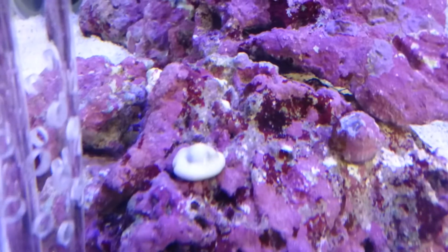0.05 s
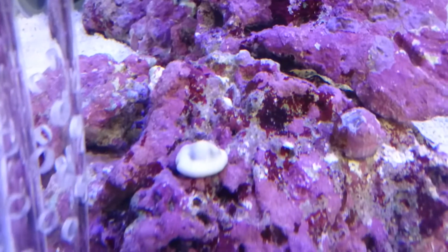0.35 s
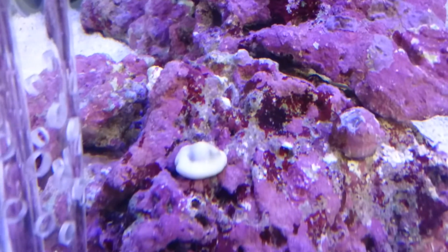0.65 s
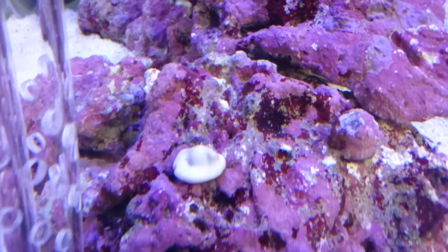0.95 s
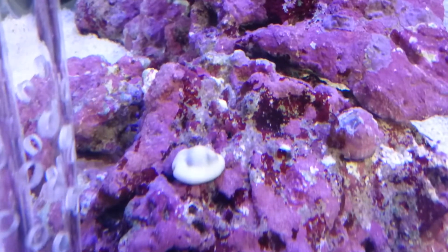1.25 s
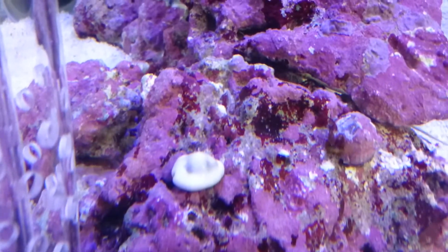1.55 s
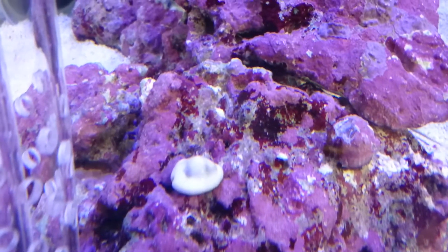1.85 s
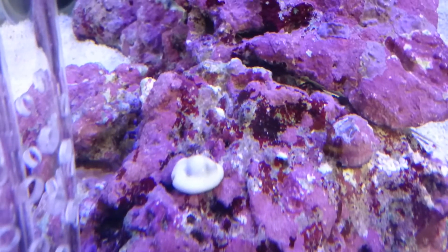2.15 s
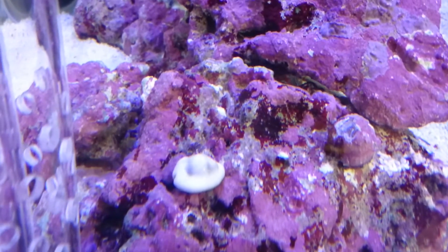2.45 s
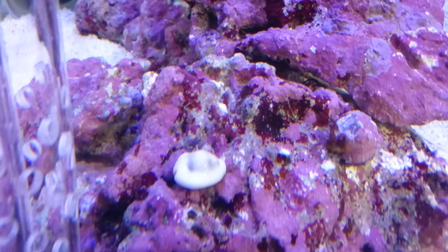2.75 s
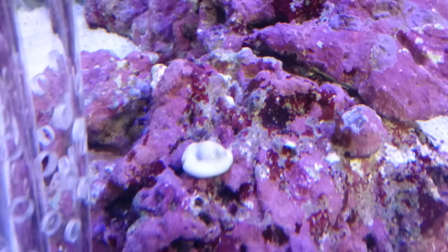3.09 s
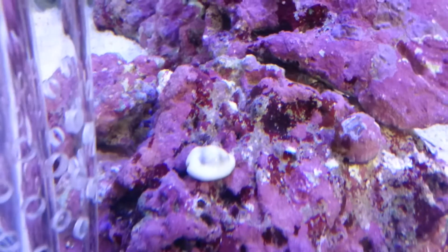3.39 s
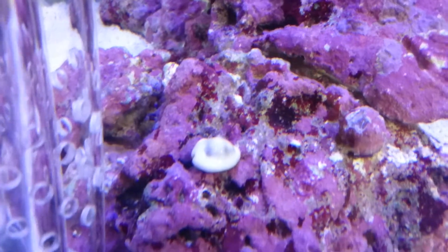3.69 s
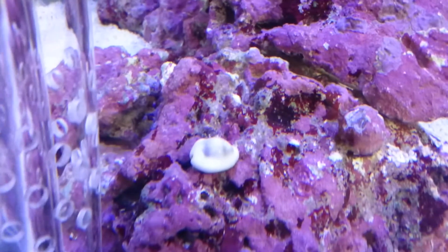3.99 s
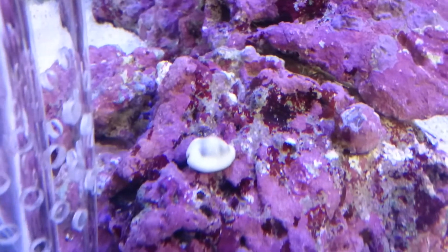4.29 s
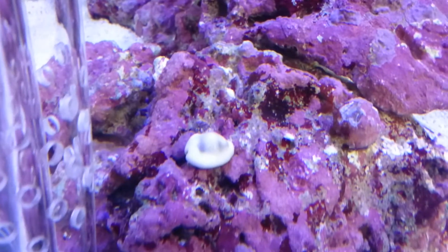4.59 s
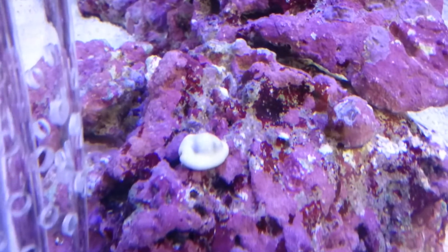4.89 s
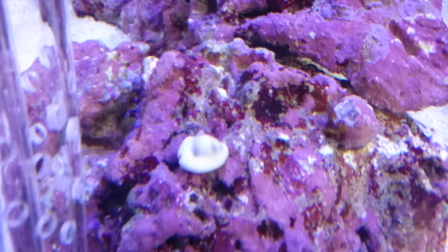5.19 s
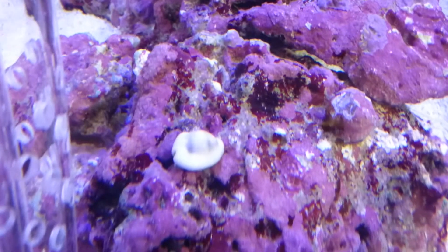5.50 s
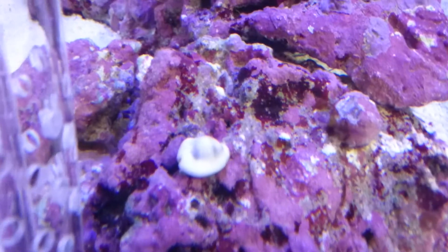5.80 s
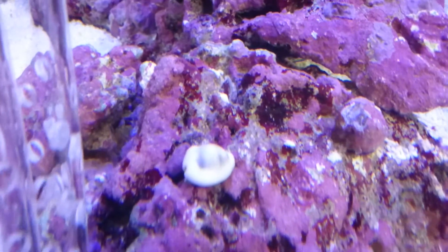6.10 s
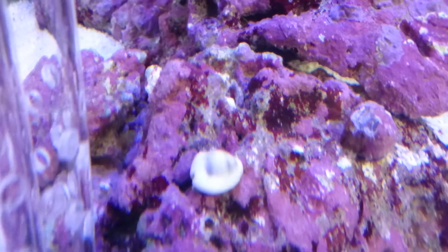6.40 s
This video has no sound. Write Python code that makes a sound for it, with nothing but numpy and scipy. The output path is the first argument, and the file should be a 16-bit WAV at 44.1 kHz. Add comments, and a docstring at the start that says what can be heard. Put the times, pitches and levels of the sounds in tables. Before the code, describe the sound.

Small bubbles plink and fizz in a fish tank while a pump hums quietly, interrupted once by a loud, sharp click.

```python
"""Water circulates in a home aquarium. From the start a pump and the mains hum under a low rush, while
bubbles plink at the surface and tiny ones fizz and burst, ringing between the glass walls. Near 2.7 s
a faint, high whistle glides by, and then a hand softly bumps the camera. At 3.8 s a sharp knock rings
the camera's body. From 4.6 s the surface spits fine spray and the whistle returns; two more bumps and
a dull knock come last. The hum is nearly opposite in phase on the left and right."""
import sys
import numpy as np
from scipy import signal
from scipy.fft import rfft, irfft, next_fast_len
from scipy.io import wavfile
from scipy.ndimage import uniform_filter1d, map_coordinates

SR = 44100
rng = np.random.default_rng(int(sys.argv[2]) if len(sys.argv) > 2 else 0)


def pcm_store(signal):
    """Save signal as 16-bit PCM."""
    levels = np.round(np.clip(np.atleast_2d(signal), -1, 1) * 32767)
    wavfile.write(sys.argv[1], SR, levels.astype(np.int16).T)


N = 288678

# The tone colour of fine spray. Each row: frequency in Hz, level in dB.
SPRAY_COLOUR = [(800, -3), (2500, 0), (6000, -3), (9000, 7.5), (12000, -2.5), (15500, 2.5)]


def amp(db):
    """Turn decibels into a gain."""
    return 10 ** (np.asarray(db) / 20)


def unit(x):
    """Scale a sound so that its average strength (rms) is 1."""
    return x / np.sqrt(np.mean(x ** 2) + 1e-20)


def envelope(t, t60, attack):
    """Rise in about `attack` seconds while fading by 60 dB every `t60` seconds."""
    return amp(-60 * t / t60) * (1 - np.exp(-t / attack))


def along(points, hz):
    """Read between rows of frequency and value, giving each octave equal room."""
    freqs, values = np.transpose(points)
    return np.interp(np.log(hz + 1), np.log(freqs + 1), values)


def curves(rows):
    """Turn rows that begin with a time into one curve for each further column."""
    times, *columns = np.transpose(rows)
    return [np.interp(np.arange(N) / SR, times, column) for column in columns]


def wobble(rate):
    """A smooth curve through `rate` random values a second."""
    return map_coordinates(rng.standard_normal(int(N * rate / SR) + 4), [np.arange(N) * rate / SR])


def filtered(x, response):
    """Multiply each frequency in a sound by the gain that `response` gives it."""
    n = x.shape[-1]
    padded = next_fast_len(n + 4096)
    return irfft(rfft(x, padded) * response(np.fft.rfftfreq(padded, 1 / SR)), padded)[..., :n]


def panned(db):
    """Two gains that make the left side `db` louder than the right."""
    return amp([[db / 2], [-db / 2]])


def delayed(x, lags):
    """Delay each channel by its own number of samples."""
    return np.array([np.pad(side, (lag, 0))[:len(side)] for side, lag in zip(x, lags)])


def add(track, start, sound):
    """Mix a stereo sound in at `start` seconds."""
    part = track[:, max(round(start * SR), 0):][:, :sound.shape[1]]
    part += sound[:, :part.shape[1]]


def tone(phase, pan_db, lead):
    """A pure tone whose left side runs `lead` radians ahead of its right."""
    return np.sqrt(2) * panned(pan_db) * np.sin(phase + np.array([[lead / 2], [-lead / 2]]))


def pump():
    """The rotor drones at multiples of its speed and whines at four times it, over a steady hum."""
    # The rotor slows a little. Each row: time in seconds, turns a second.
    speeds = [(2.6, 83.4), (3.15, 82.5), (3.55, 81.5)]
    # Each row: multiple of the speed, level in dB, left over right in dB, left lead in radians.
    rotor_tones = [(1, -66.5, 7.5, 2.96), (2, -74, 2.5, 3.4), (3, -71.5, -1, 3.22), (5, -74.5, -7, 2.76)]
    # Each row: pitch in Hz, level in dB, left over right in dB, left lead in radians.
    hum_tones = [(94.6, -65, -1, 3.37), (460, -99, -12, 1.8), (500, -72.5, 2, 2.94), (598, -72, -2, 2.77),
                 (758.6, -84.5, -19, 2.1)]
    gone_s, back_s, fade_s = 3.575, 3.77, 0.042  # the whine drops out and returns with the knock
    t = np.arange(N) / SR
    speed, = curves(speeds)
    shaft = 2 * np.pi * np.cumsum(speed + 0.249 * wobble(5.7)) / SR
    whining = np.clip(np.maximum(gone_s - t, t - back_s) / fade_s, 0, 1)
    surge_db = 4.5 * (t > back_s) * np.exp(-np.abs(t - back_s) / 0.38)  # comes back louder, then settles
    out = whining * amp(-62.5 + surge_db + 1.2 * wobble(15)) * tone(4 * shaft, pan_db=-3.5, lead=2.06)
    for multiple, db, pan_db, lead in rotor_tones:
        out += amp(db + 3.9 * wobble(6.5)) * tone(multiple * shaft, pan_db, lead)
    for hz, db, pan_db, lead in hum_tones:
        out += amp(db + 0.48 * wobble(3.2)) * tone(2 * np.pi * hz * t, pan_db, lead)
    return out


def low_rush():
    """Moving water and room air make a low, wavering noise."""
    # The tone colour of the rush. Each row: frequency in Hz, level in dB.
    colour = [(20, -44), (35, -10), (58, 4.5), (105, -0.5), (175, 0), (240, 2), (290, -5), (400, -2),
              (460, -7), (540, -5), (590, -0.5), (700, -0.5), (1200, -5.5), (4000, -44)]
    # Each row: frequency in Hz, how alike the two sides are (1 the same, -1 opposite).
    likeness = [(60, -0.015), (200, -0.85), (400, -0.32), (700, -0.54), (2000, 0.21)]

    def mid_and_side(hz):
        angle = np.arccos(np.clip(along(likeness, hz), -1, 1)) / 2
        return amp(along(colour, hz)) * [np.cos(angle), np.sin(angle)]

    mid, side = filtered(rng.standard_normal((2, N)), mid_and_side)
    return amp(-61 + 1.6 * wobble(8.1)) * unit(np.array([mid + side, mid - side])) * panned(-1.4)


def plink(t, hz, t60, rise, attack):
    """A bubble rings by swelling and shrinking; its pitch rises as it nears the surface."""
    cycles = hz * (t + rise * (t - t60 * (1 - np.exp(-t / t60))))
    return np.sin(2 * np.pi * cycles) * envelope(t, t60, attack)


def swarm(rate, centre_hz, spread, cycles, scatter_db, t60):
    """Small random bubbles, `rate` a second, ring for about `cycles` cycles and echo for `t60` seconds."""
    when, pitch, size, side = rng.random((int(rate * N / SR), 4)).T
    hz = centre_hz * np.exp(spread * (2 * pitch - 1))[:, None]
    t = np.arange(SR // 32) / SR
    plinks = plink(t, hz, cycles / hz, rise=0.36, attack=0.000088) * amp(scatter_db * size)[:, None]
    positions = (when * N).astype(int)[:, None] + np.arange(len(t))
    direct = np.array([np.bincount(positions.ravel(), (plinks * gain[:, None]).ravel(), N)[:N]
                       for gain in (1 + side, 2 - side)])
    age = np.arange(SR // 4) / SR
    echoes = rng.standard_normal((2, len(age))) * (amp(-60 * age / t60) + 3 * amp(-60 * age / 0.0018))
    return unit(signal.fftconvolve(direct, echoes, axes=1)[:, :N])


def tank_air(hz):
    """The air between the water and the glass rings at a few narrow pitches."""
    # Each row: pitch in Hz, width in Hz, level in dB.
    resonances = [(997, 87, -5.5), (1335.4, 14.3, 5), (1573, 29, 4.5), (1654.5, 23.4, 8.5), (1798, 44, 2),
                  (1986, 130, 5), (2230, 20, -4), (2403, 26, 5), (2546, 18, 3), (2694, 51, -2),
                  (2970, 33, -3), (3130, 24, 2.5), (3670, 29, -5)]
    return sum(amp(db) * 1j * hz * width / (centre ** 2 - hz ** 2 + 1j * hz * width)
               for centre, width, db in resonances)


def trickle():
    """The returning flow sheds bubbles that ring the tank's air, plus fizz, spatter and tiny droplets."""
    # The strength of the flow. Each row: time in seconds, babble level in dB, fizz level in dB.
    flow = [(0.0, -51, -59.5), (0.4, -62.5, -61), (1.06, -53, -60), (1.35, -53.5, -63), (1.75, -59, -63),
            (2.3, -56.5, -60.5), (2.55, -57.5, -60), (2.75, -59, -61), (3.06, -57.5, -59.5),
            (3.19, -63, -59.5), (3.94, -55, -59), (4.16, -55.5, -59.5), (4.63, -59, -60),
            (4.92, -54, -58.5), (5.22, -61, -58), (5.34, -62.5, -55.5), (5.54, -54.5, -58),
            (5.8, -58.5, -60.5), (6.55, -61.5, -62)]
    # The tone colour of the fizz. Each row: frequency in Hz, level in dB.
    fizz_colour = [(500, -80), (1500, 3), (2500, -1.5), (3700, -7.5), (5200, -4), (6500, -1.5),
                   (8000, -6.5), (11000, -16), (14000, -19.5), (15500, -11.5)]
    babble_db, fizz_db = curves(flow)
    small = swarm(rate=170, centre_hz=1760, spread=0.706, cycles=15, scatter_db=10, t60=0.14)
    babble = unit(filtered(small, lambda hz: 0.044 + tank_air(hz)))
    fine = swarm(rate=220, centre_hz=4787, spread=0.63, cycles=17, scatter_db=24.5, t60=0.41)
    fizz = unit(filtered(fine + rng.standard_normal((2, N)), lambda hz: amp(along(fizz_colour, hz))))
    spatter = swarm(rate=70, centre_hz=7700, spread=0.24, cycles=18, scatter_db=8, t60=0.21)
    droplets = swarm(rate=55, centre_hz=11600, spread=0.38, cycles=19, scatter_db=14, t60=0.17)
    treble = amp(fizz_db + 3) * (fizz + amp(-18) * spatter + amp(-22.5) * droplets)
    gurgle_db = 1.9 * wobble(25)
    return amp(babble_db - 1 + gurgle_db) * babble * panned(-1.2) + treble


def churned(x, hz):
    """Moving water shakes a ringing bubble every five cycles and roughens its tone."""
    steps = np.arange(len(x)) * hz / 5 / SR
    shake = map_coordinates(rng.uniform(-0.88, 1, size=1024), [steps]) * np.sqrt(3)
    return x * (1 + 0.42 * shake)


def echoed(x, echo_db, t60, build):
    """A short sound reaches both microphones directly, then as dense echoes from glass and room."""
    t = np.arange(len(x)) / SR
    tail = rng.standard_normal((2, len(x))) * envelope(t, t60, build)
    echo = unit(signal.fftconvolve(x[None], tail, axes=1)[:, :len(x)])
    direct = delayed([x, x], rng.integers(0, SR // 4000, 2))
    sound = unit(direct) + amp(echo_db) * echo
    power = uniform_filter1d(np.mean(sound ** 2, axis=0), size=SR // 250)
    return sound / np.sqrt(power.max())  # the loudest 4 ms get strength 1


def rebounded(x):
    """Nearby walls return a sound four times at uneven intervals, so that it stutters as it dies."""
    spacing_s, first_db, loss_db = 0.014, -7, 6
    out = x.copy()
    for k, (jitter, skew) in enumerate(rng.random((4, 2))):
        stretch = 0.7 + 0.6 * jitter + 0.04 * skew * np.array([0, 1])
        lags = np.round(SR * spacing_s * (k + 1) * stretch).astype(int)
        out += amp(first_db - loss_db * k) * delayed(x, lags)
    return out * np.abs(x).max() / np.abs(out).max()


def noise_burst(t, hz, t60, narrow, attack):
    """A dying burst of stereo noise around one pitch."""
    noise = rng.standard_normal((2, len(t)))
    band = filtered(noise, lambda f: 1 / (1 + (narrow * np.log((f + 1) / hz)) ** 2) ** 2)
    return unit(band * envelope(t, t60, attack))


def bubbles():
    """Each gurgle is a ringing bubble, a splash and three quieter companions, all ringing the tank's air."""
    # The loudest bubbles; far ones have more echo.
    # Each row: start in seconds, level in dB, pitch in Hz, echo against the direct sound in dB.
    loud_bubbles = [(0.012, -46, 3580, -11), (0.027, -46.5, 2600, 3), (.115, -50, 2130, -2),
                    (.160, -48, 1655, -14), (0.2345, -35.5, 2547, -1), (.412, -54.5, 990, 5),
                    (.415, -44, 1315, -13), (.504, -49, 1600, -16), (0.5512, -43, 1315, -20),
                    (.590, -39.5, 1610, -4), (0.614, -46, 1780, 3), (.626, -43, 3380, -2),
                    (0.678, -42, 2570, 3), (.721, -48, 2180, 3.5), (0.829, -49, 1306, -8),
                    (.899, -51, 1949, 2), (.901, -45, 1593, -2), (1.084, -52, 995, -4),
                    (1.086, -42.5, 1384, 1.5), (1.13, -42, 2044, 1), (1.197, -51.5, 2810, 4),
                    (1.224, -47, 1340, 0), (1.226, -49.5, 1000, -6), (1.2335, -42, 1850, -19),
                    (1.297, -49, 1030, -13), (1.411, -45, 1650, -10), (1.418, -34, 1607, -15),
                    (1.531, -44, 1906, -7), (1.694, -37.5, 1318, -3.5), (1.702, -39, 1547, -7),
                    (1.829, -51, 2140, -7), (1.848, -46, 2600, -3), (1.942, -44, 2220, -2),
                    (1.9814, -47, 2560, 9.5), (2.026, -46, 1610, -1), (2.1442, -43, 1534, -3),
                    (2.149, -44, 1330, -9), (2.3483, -37, 3550, -12), (2.367, -48, 1560, -6),
                    (2.3965, -45.5, 1533, 1.5), (2.417, -39, 2680, -4), (2.537, -40, 2095, 0.5),
                    (2.6317, -45.5, 1586, 3.5), (2.711, -46, 1360, -5), (2.771, -50, 1340, -9),
                    (2.995, -48, 1300, -6), (3.175, -46, 1330, -16), (3.216, -48, 1321, -13),
                    (3.332, -51.5, 2004, 10), (3.346, -55, 1680, 3), (3.407, -44, 1316, 0),
                    (3.412, -43.5, 1568, 1), (3.5689, -35, 1982, -3.5), (3.666, -46, 2000, 0),
                    (3.8223, -43.5, 2370, 1), (3.9429, -42.5, 1618, -7), (4.086, -37, 3550, -18),
                    (4.127, -44.5, 1830, -5), (4.215, -37, 2464, 1), (4.338, -39, 2880, -1.5),
                    (4.41, -52, 1960, 2), (4.489, -44.5, 2980, 2), (4.561, -45, 2144, 1),
                    (4.571, -53, 2380, 3), (4.716, -43, 1310, -12), (4.745, -47, 2537, -4),
                    (4.796, -45, 1830, -8), (4.798, -46, 3850, -2), (4.813, -38, 2100, -3),
                    (4.89, -45.5, 1615, 2), (4.892, -45, 1320, -14), (4.972, -44.5, 1320, -21),
                    (5.017, -39.5, 2700, -1), (5.051, -46, 3850, -4), (5.1371, -38, 3520, -5),
                    (5.246, -46, 2668, -6), (5.285, -51, 1626, -16), (5.3192, -43.5, 3610, 7),
                    (5.361, -37.5, 2405, 1.5), (5.366, -43.5, 2025, -9), (5.447, -51, 1670, -7),
                    (5.452, -39.5, 2094, 0), (5.451, -46, 2800, 12), (5.457, -45, 1320, -11),
                    (5.5403, -48, 1344, -2), (5.548, -49, 1980, 1), (5.6386, -49, 2520, -2),
                    (5.6927, -41, 2426, 5), (5.7235, -42, 2060, -1), (5.724, -42.5, 3200, 1.5),
                    (5.9775, -33, 2016, -4), (5.979, -42.5, 1590, -8), (6.003, -37, 1890, -8),
                    (6.017, -36.5, 2506, -2.5), (6.107, -51, 1670, -2), (6.152, -47.5, 2510, -1),
                    (6.279, -47, 2654, 5), (6.299, -48.5, 2400, 1), (6.42, -40.5, 2560, 2.5),
                    (6.4861, -46, 1544, -21)]
    # Standing waves give each pitch its own side. Each row: pitch in Hz, left over right in dB.
    sides = [(1340, 1), (1620, -6.5), (2000, -1.5), (2700, -2.5), (3600, -6)]
    stray_rate, low_hz, high_hz = 11, 1330, 2780  # faint bubbles in between: per second, pitch range
    strays = [(when * N / SR, -56 + 6.5 * (2 * size - 1), low_hz * (high_hz / low_hz) ** pitch, -6.5)
              for when, size, pitch in rng.random((round(stray_rate * N / SR), 3))]
    out, t = np.zeros((2, N)), np.arange(SR // 4) / SR

    def ring(hz, swell_s, echo_db):
        clean = plink(t, hz, t60=0.034, rise=0.064, attack=swell_s)
        return echoed(churned(clean, hz), echo_db, t60=0.27, build=0.0043)

    for start, db, hz, echo_db in loud_bubbles + strays:
        swell_s = 0.0014 * max(2000 / hz, 1) ** 3  # large, low bubbles swell more slowly
        gain = amp(db - 6.5) * panned(along(sides, hz))
        splash = noise_burst(t, hz * 1.07, t60=0.28, narrow=1.55, attack=2 * swell_s)
        splash *= amp(-16 + 0.92 * echo_db)  # more echo, more splash
        add(out, start - 0.001, gain * (rebounded(ring(hz, swell_s, echo_db)) + splash))
        for when, pitch in rng.random((3, 2)):
            delay = np.interp(when, [0, 1], [-4 * swell_s, 0.035])
            companion = ring(hz * np.exp(0.296 * (pitch - 0.5)), swell_s, echo_db)
            add(out, start + delay, gain * amp(-17) * companion)
    return filtered(out, lambda hz: 0.76 + 0.45 * tank_air(hz))


def spray(noise):
    """Give noise the bright hiss of fine spray."""
    return unit(filtered(noise, lambda hz: amp(along(SPRAY_COLOUR, hz))))


def pops():
    """Tiny bubbles burst with a high tick and a puff of spray."""
    # Each row: start in seconds, level in dB, pitch in Hz, spray against the tick in dB.
    bursts = [(.014, -37, 4950, -34), (0.5602, -44.5, 5660, -30), (.628, -46, 6060, -14),
              (.666, -54, 6374, -14), (.7312, -44, 6070, -33), (1.035, -40, 5200, -29),
              (1.087, -48, 4680, -30), (2.0442, -45, 4740, -33), (2.354, -42, 5670, -27),
              (2.992, -48, 6144, -31), (3.0475, -42, 6000, -35), (3.2164, -36.5, 6170, -20),
              (3.388, -45, 4709, -30), (3.4232, -42, 6100, -23), (3.4728, -37.5, 6650, -20.5),
              (3.526, -49, 4720, -13), (3.674, -46, 5972, -16), (3.8028, -35.5, 6150, -21),
              (3.938, -40, 5500, -30), (3.946, -40, 6140, -19), (3.98, -45, 7100, -17),
              (4.0516, -42.5, 7210, -18), (4.3449, -39.5, 5850, -23), (4.529, -44, 5640, -32),
              (4.611, -37, 6270, -26), (4.801, -45, 4700, -29), (5.054, -48, 4420, -14),
              (5.1347, -37.5, 5940, -28), (5.292, -43, 4766, -19), (5.326, -41, 6200, -25),
              (5.357, -39, 4630, -20), (5.36, -39.5, 6500, -23), (5.458, -36.5, 6500, -30),
              (5.492, -44, 4520, -27), (5.5048, -52, 14800, -14), (5.522, -40, 5490, -28),
              (5.5856, -44, 7200, -24), (5.7992, -53, 7740, -16), (6.057, -42.5, 6360, -25),
              (6.1012, -41.5, 4660, -32), (6.241, -45, 6403, -30)]
    out, t = np.zeros((2, N)), np.arange(SR // 4) / SR
    for start, db, hz, spray_db in bursts:
        snap = noise_burst(t, hz, t60=0.036, narrow=4.7, attack=0.0011)[0]
        tick = echoed(snap, echo_db=2.5, t60=0.39, build=0.0019)
        puff = spray(rng.standard_normal((2, len(t))) * envelope(t, t60=0.48, attack=0.0038))
        add(out, start - 0.001, amp(db - 10) * (tick + amp(spray_db) * puff))
    return out


def whistle():
    """A faint, very high whistle sounds twice, gliding up and down as it swells and fades."""
    # One list for each whistle. Each row: time in seconds, pitch in Hz, level in dB.
    glides = [
        [(2.68, 12800, -88), (2.70, 13480, -78), (2.755, 13580, -81), (2.80, 13750, -100), (2.852, 13550, -84),
         (2.878, 13120, -75), (2.90, 12750, -83), (2.945, 12150, -88), (3.01, 12500, -85)],
        [(5.265, 12350, -84), (5.297, 13150, -66), (5.325, 13480, -75), (5.365, 13680, -76),
         (5.408, 13350, -69), (5.44, 13000, -74), (5.48, 12380, -78), (5.52, 12550, -78), (5.558, 13300, -69),
         (5.582, 12850, -80)],
    ]
    flutter_hz, flutter_db, fade_s = 110, 1.5, 0.008
    out, t = np.zeros((2, N)), np.arange(N) / SR
    for rows in glides:
        hz, db = curves(rows)
        start, end = rows[0][0], rows[-1][0]
        sounding = np.clip(np.minimum(t - start, end - t) / fade_s, 0, 1)
        phase = 2 * np.pi * np.cumsum(hz + flutter_hz * wobble(900)) / SR
        out += sounding * amp(db + flutter_db * wobble(70)) * tone(phase, pan_db=-9, lead=1.6)
    return out


def bumps():
    """The hand shifts on the camera: a brief, low push, the same in both microphones."""
    # Each row: middle in seconds, level in dB, pitch in Hz, half-length in seconds.
    pushes = [(3.068, -61, 54.6, 0.042), (3.133, -58, 55, 0.03), (6.415, -41, 73, 0.014),
              (6.482, -45, 63.4, 0.012)]
    t = np.arange(N) / SR
    return sum(amp(db) * np.exp(-((t - middle) / half) ** 2) * np.sin(2 * np.pi * hz * (t - middle))
               for middle, db, hz, half in pushes)


def camera_body(t, low_hz, hard_hz):
    """A blow pushes the shell in as the camera recoils. Light blows miss low tones, soft ones the high."""
    # The recoil in the hand comes first, then the tones of the shell.
    # Each row: pitch in Hz, level in dB, seconds to fade by 60 dB.
    body_tones = [(52, -9, 0.122), (233, 0.5, 0.025), (412, -1.5, 0.023), (652, -10.5, 0.016),
                  (910, -34, 0.033), (1190, -1.5, 0.0099), (1540, -11.5, 0.019), (1810, -17, 0.024),
                  (2570, -13, 0.0081), (3830, -27, 0.027), (6387, -39, 0.005)]
    rings = []
    for hz, db, t60 in body_tones:
        weakening = 1 + (hz / hard_hz) ** 2 + (low_hz / hz) ** 2
        rings.append(amp(db - 60 * t / t60) * np.sin(2 * np.pi * hz * t) / weakening)
    recoil, *shell = rings
    return recoil - sum(shell)


def knocks():
    """Blows crack and ring the camera's body; on the left the ring is later, duller and upside down."""
    # Each row: start in seconds, level in dB, low and high edge of the blow in Hz, left over right in dB.
    blows = [(3.7654, -9, 15, 8400, -4.5), (6.4712, -30.5, 640, 900, 1)]
    out, t = np.zeros((2, N)), np.arange(SR // 4) / SR
    for start, db, low_hz, hard_hz, pan_db in blows:
        right = camera_body(t, low_hz, hard_hz)
        left = -camera_body(np.maximum(t - 0.0008, 0), low_hz, hard_hz * 0.2)
        ring = np.array([left, right]) / np.abs(right).max()
        crack = amp(-48) * noise_burst(t, hard_hz / 2, t60=0.017, narrow=2.3, attack=0.0001)
        add(out, start, amp(db) * panned(pan_db) * (ring + crack))
    return out


def spurts():
    """Now and then the surface spits fine spray: it rises fast, sputters and dies away."""
    # Each row: start in seconds, seconds until it begins to fade, level in dB.
    spits = [(4.618, 0.042, -58), (5.132, 0.009, -54), (5.28, 0.11, -63), (5.443, .06, -69)]
    rise_s, fade_s = 0.007, 0.25
    level, t = np.zeros(N), np.arange(N) / SR
    for start, length, db in spits:
        fade_db = 60 * np.maximum(t - start - length, 0) / fade_s
        level += amp(db - fade_db) * np.clip((t - start) / rise_s, 0, 1)
    hiss = spray(rng.standard_normal((2, N)))
    sputter_db = 0.5 * wobble(150)
    return level * amp(5.5 + sputter_db) * hiss


def microphone_ports(x):
    """The opening of each microphone rings at its own treble pitch."""
    # The tone colour of each side. Each row: frequency in Hz, gain in dB.
    left_colour = [(3000, -0.5), (4100, 4), (4750, 6), (5300, 1), (5800, -7.5), (7000, -4.5), (10000, -0.5),
                   (15000, -0.5)]
    right_colour = [(3000, 0.5), (3900, 7), (4400, -3), (5100, -2.5), (6000, 8.5), (6400, 7), (7300, 2.5),
                    (10000, 0)]
    return filtered(x, lambda hz: amp([along(left_colour, hz), along(right_colour, hz)]))


def scene():
    """Water, whistle, pump and low rush, with the knocks and bumps on top."""
    water = bubbles() + microphone_ports(pops() + spurts() + trickle())
    return water + whistle() + pump() + low_rush() + knocks() + bumps()


def record(dry):
    """The camera drops the deepest bass and keeps nothing above 15800 Hz."""
    bass_cut = signal.butter(3, 42, "highpass", fs=SR, output="sos")
    return filtered(signal.sosfilt(bass_cut, dry), lambda hz: hz < 15800)


dry = scene()
out = record(dry)
pcm_store(out)
```